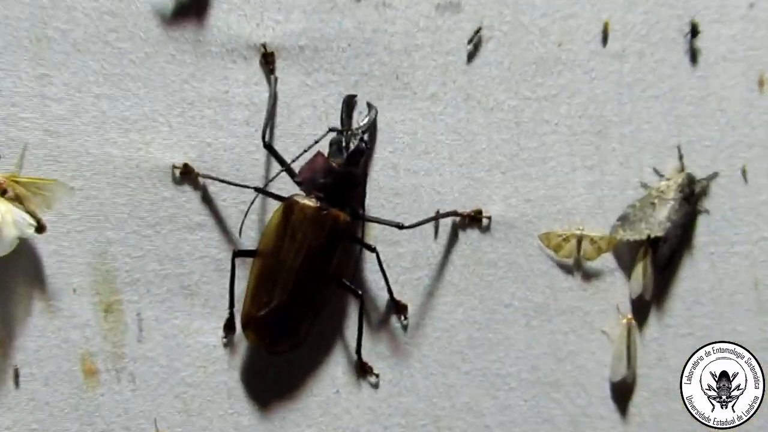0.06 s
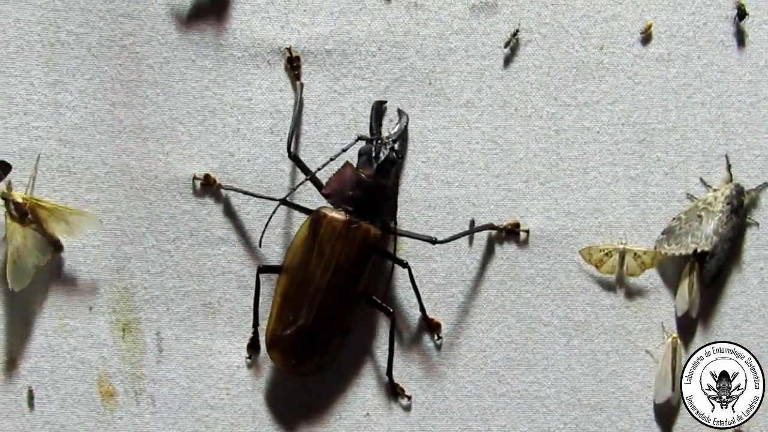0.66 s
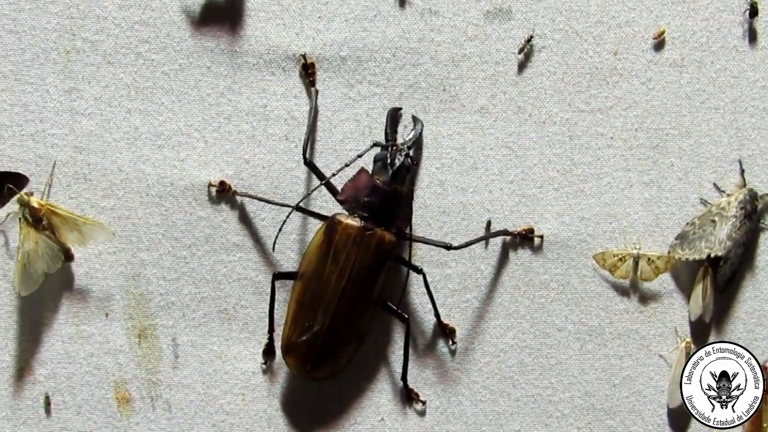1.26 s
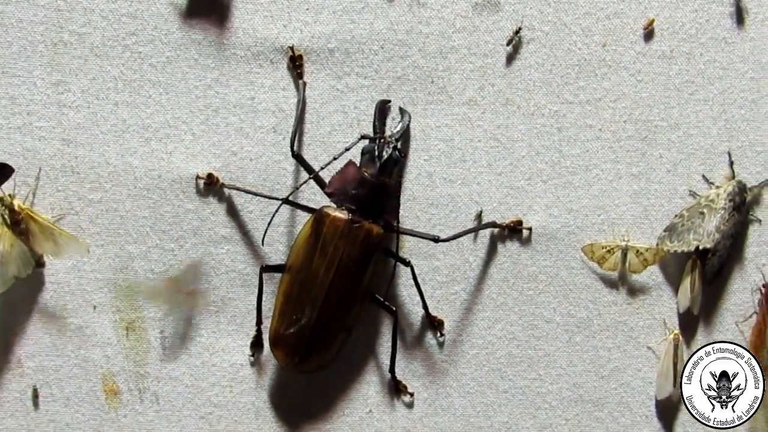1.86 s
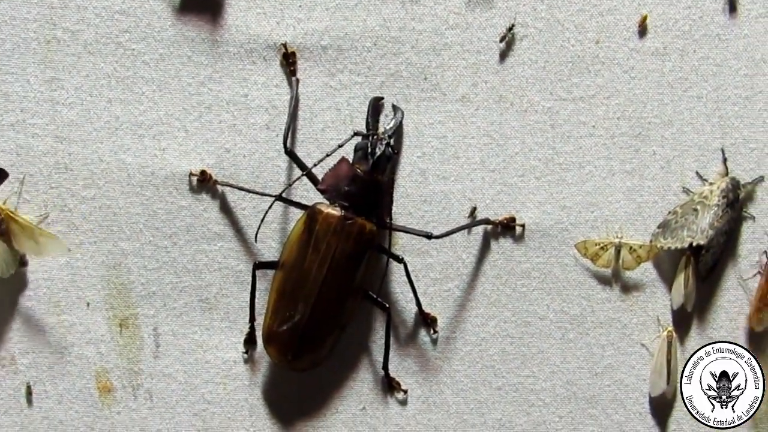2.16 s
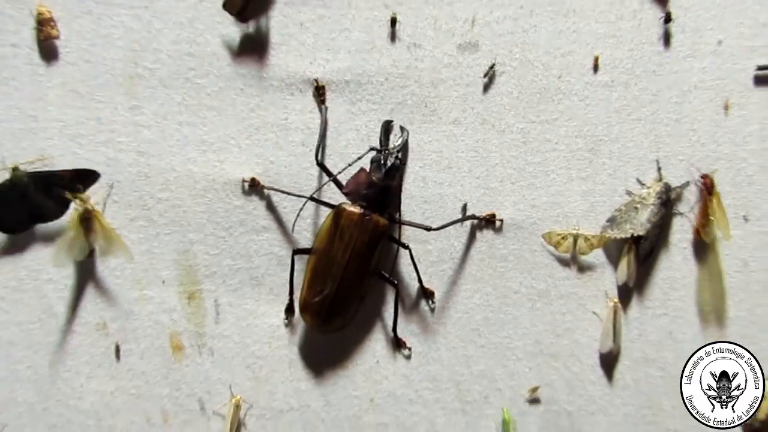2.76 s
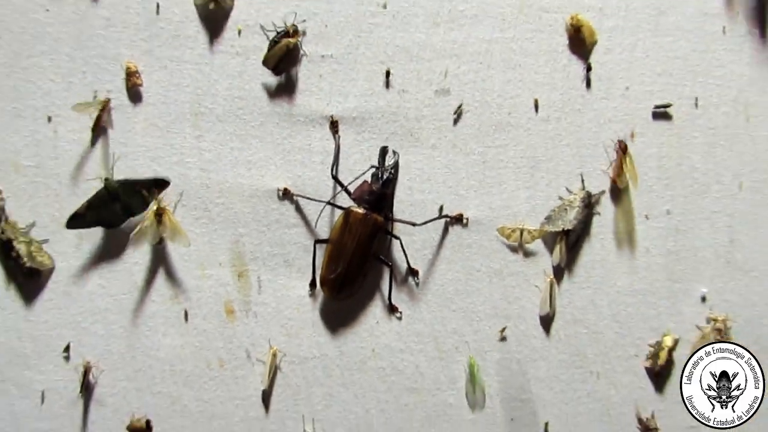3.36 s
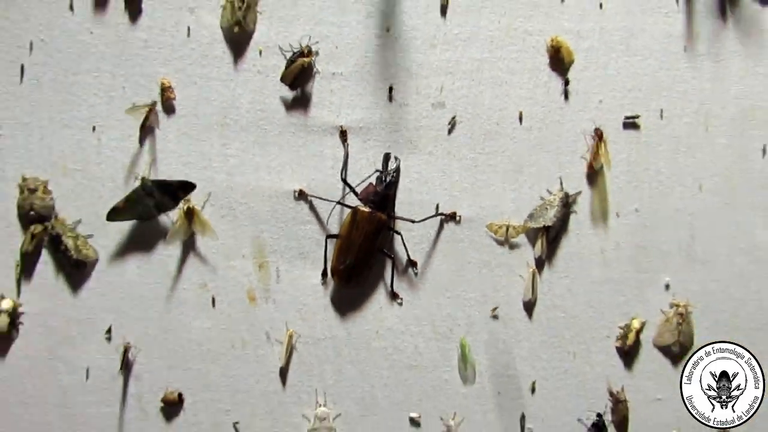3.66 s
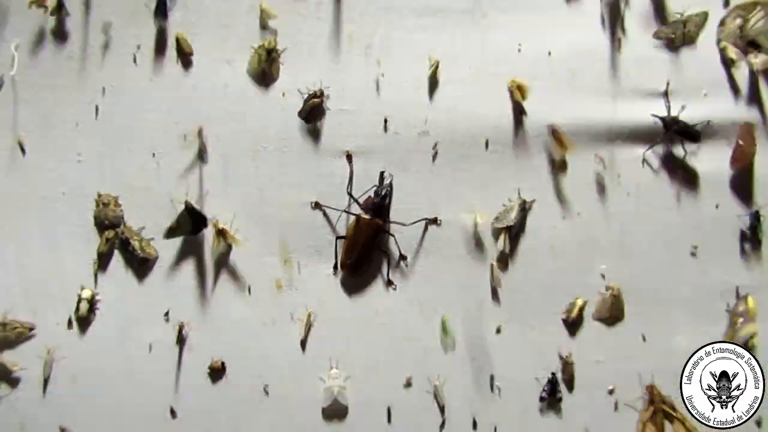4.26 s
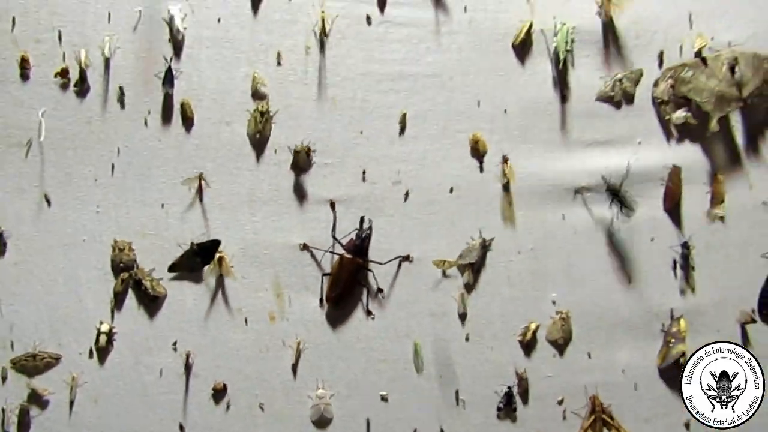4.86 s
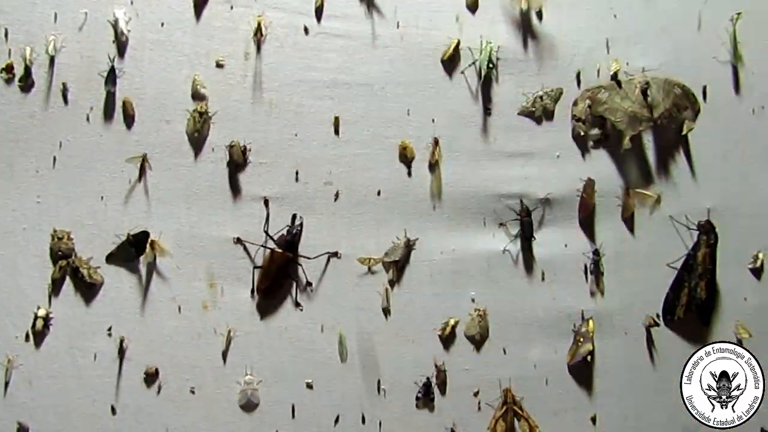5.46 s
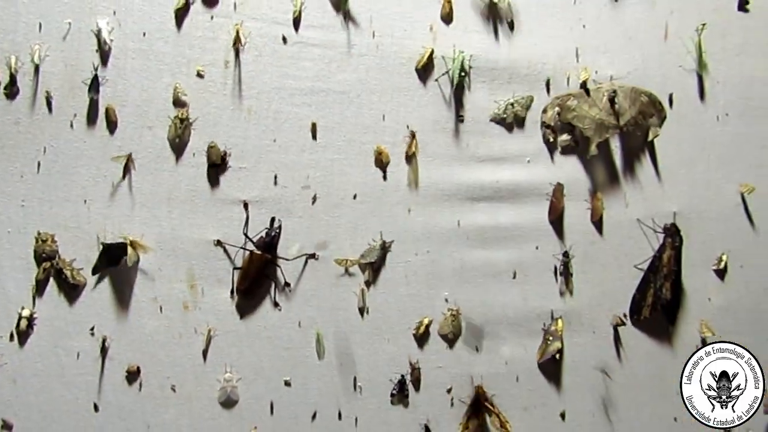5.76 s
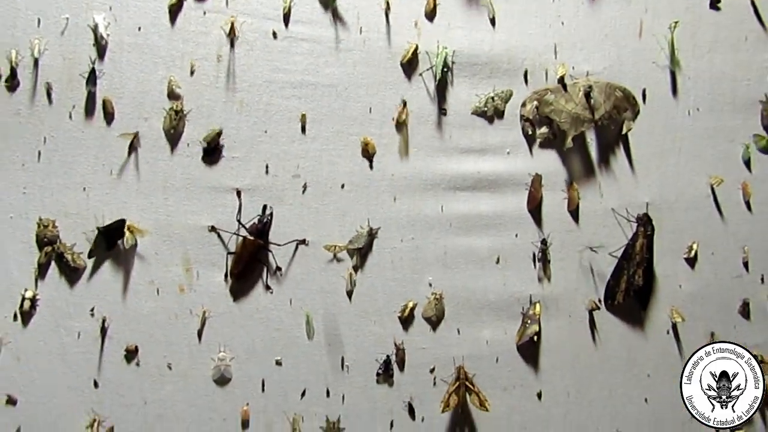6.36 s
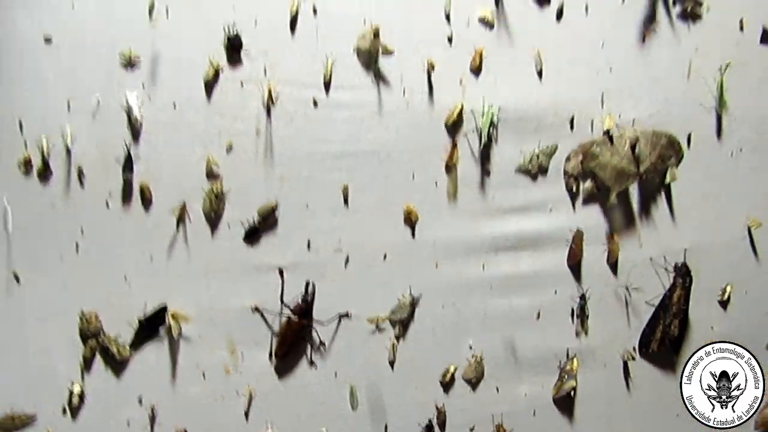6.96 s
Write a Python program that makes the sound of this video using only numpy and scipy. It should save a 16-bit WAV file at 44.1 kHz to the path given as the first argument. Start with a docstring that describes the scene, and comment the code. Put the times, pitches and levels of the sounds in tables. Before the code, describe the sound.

Insects tap and click against a cloth sheet over steady night hiss, high katydid rasping and a few very high chirps.

```python
"""Outdoors at night beside a lamp-lit sheet, heard through a small handheld camera's stereo microphone.
Up close, insects thud on the cloth and their hard shells crack, tick and ring on the things around it.
A few very high chirps pass close by; farther out, crickets and a high katydid chorus fill the dark.
Fingers rustle on the camera body, and the lamp's supply hums faintly in the steady night air."""
import sys
import numpy as np
from scipy import signal
from scipy.fft import rfft, irfft, next_fast_len
from scipy.io import wavfile

SR = 44100
rng = np.random.default_rng(int(sys.argv[2]) if len(sys.argv) > 2 else 0)


def wav_record(signal):
    """Record a signal, one row per channel, as 16-bit PCM in the file named by sys.argv[1]."""
    frames = np.transpose(np.atleast_2d(signal))
    bounded = np.clip(frames, -1, 1)
    # unit amplitude maps onto the largest positive 16-bit level
    quanta = np.round(bounded * 32767).astype(np.int16)
    wavfile.write(sys.argv[1], SR, quanta)


N = 313110
EDGE_HZ = 15700  # top of the microphone's range
# how alike the two microphone ports hear: (frequency [Hz], left-right likeness [-1..1])
LIKENESS = [(40, -0.46), (300, -0.79), (740, -0.61), (2000, -0.063), (3300, 0.39), (5500, 0.51),
            (13000, -0.29)]


def knocks(thud_t60=0.026, crack_t60=0.018, splinter_db=-14):
    """Insects hit the sheet: the cloth gives a damped thud, the hard shell a shorter crack on top."""
    # (time [s], thud level [dB], thud centre [Hz], crack level [dB], left-right likeness [-1..1])
    hits = [(0.1934, -30, 560, -28.5, -0.33), (0.1973, -38, 850, -25.5, 0.34),
            (0.3073, -29, 1090, -50, -0.43), (0.875, -45, 895, -42.5, 0.99),
            (1.7217, -40, 666, -38.5, 0.93), (1.7619, -34.5, 390, -32.5, 0.024),
            (2.227, -50, 590, -39, 0.23), (2.308, -32.5, 620, -25, -0.45), (2.3148, -29, 500, -34, -0.24),
            (2.3215, -37, 546, -26, -0.71), (2.396, -45, 900, -32.5, -0.56), (2.42, -31, 400, -40, -0.71),
            (2.6383, -36, 800, -24.5, -0.11), (2.7135, -47, 700, -37, 0.41),
            (3.1075, -29.5, 590, -35, -0.25), (3.835, -34.5, 860, -35, -0.24),
            (3.8962, -31, 450, -46, -0.38), (4.302, -36, 393, -39, 0.18), (4.313, -39, 702, -42, 0.7),
            (4.798, -32.5, 600, -32.5, -0.7), (5.4482, -34.5, 1110, -44.5, 1), (6.2, -37, 930, -57, 0.94),
            (6.489, -40, 1030, -38, 0.97), (6.4991, -40.5, 1200, -47, 0.87), (6.5665, -43, 1150, -43.5, 1),
            (6.654, -37, 710, -33.5, -0.22), (6.886, -41.5, 500, -46, 0.28), (6.931, -41, 700, -43, -0.21),
            (6.9767, -33, 520, -33.5, -0.23), (7.0314, -40, 950, -50, 0.79)]
    out = np.zeros((2, N))
    for s, thud_db, hz, crack_db, likeness in hits:
        thud = burst(hz / 1.44, hz * 1.44, thud_t60, likeness, order=1)
        crack = burst(1300, 3000, crack_t60, likeness, snap=0.17)
        splinter = gain_of(splinter_db) * burst(7000, 8800, crack_t60, likeness, order=1, snap=2.9)
        add(out, s, gain_of(thud_db) * thud + gain_of(crack_db) * (crack + splinter))
    return out


def shell_ticks(top_db=-3, ring_db=-8, ring_hz=7200):
    """Shells and legs make light, bright ticks, and each sets a thin ring going."""
    # (time [s], level [dB], centre [Hz])
    ticks = [(0.527, -41, 9500), (0.875, -42.5, 8000), (0.942, -34, 9000), (1.572, -37, 8400),
             (2.3083, -36.5, 4500), (2.3224, -34, 6100), (2.639, -37.5, 8600), (2.567, -42, 5450),
             (4.8847, -43.5, 8700), (5.449, -34, 5100), (5.466, -40.5, 6000), (6.488, -31, 6260),
             (6.566, -40.5, 6600), (6.852, -42.5, 8400)]
    out = np.zeros((2, N))
    for s, db, hz in ticks:
        body = burst(hz / 1.53, hz * 1.53, t60=0.024, likeness=1, order=4, rise=0.0001, snap=1.7)
        top = gain_of(top_db) * burst(hz, EDGE_HZ, t60=0.002, likeness=0.8, order=1)
        ring = gain_of(ring_db) * burst(ring_hz / 1.04, ring_hz * 1.04, t60=0.067, likeness=1)
        add(out, s, gain_of(db) * (body + top + ring))
    return out


def pings(rattle_rad=0.35):
    """Hard things by the sheet ring briefly when hit, with a slight rattle."""
    # (time [s], pitch [Hz], level [dB], t60 [s])
    rings = [(0.198, 970, -25.5, 0.03), (2.396, 1610, -30, 0.056), (3.108, 850, -22, 0.021),
             (4.6, 2420, -25.5, 0.031), (4.799, 1150, -24.5, 0.035), (5.4502, 2492, -31, 0.14),
             (5.467, 6891, -35, 0.065), (6.655, 491, -32.5, 0.068), (6.979, 443, -32, 0.063)]
    t, out = np.arange(SR // 4) / SR, np.zeros((2, N))
    for s, hz, db, t60 in rings:
        phase = 2 * np.pi * hz * t + rattle_rad * drift(hz / 2, len(t))
        add(out, s, gain_of(db) * decay(t, t60) * np.sin(phase))
    return out


def bumps():
    """Some blows land as soft, low bumps."""
    # (time [s], level [dB], centre [Hz], t60 [s])
    blows = [(0.305, -33, 80, 0.054), (2.695, -29.5, 160, 0.064), (3.896, -29.5, 170, 0.019),
             (4.311, -27.5, 66, 0.04), (6.886, -36.5, 120, 0.0185)]
    out = np.zeros((2, N))
    for s, db, hz, t60 in blows:
        add(out, s, gain_of(db) * burst(hz / 1.64, hz * 1.64, t60, read(LIKENESS, hz), order=1))
    return out


def clacks(t60=0.003, left_lag_s=0.00018, left_db=-4.5):
    """A shell hits squarely: a hard swing of pressure, gone in a few cycles, at the right port first."""
    # (time [s], level [dB], pitch [Hz])
    square_hits = [(0.198, -10, 2450), (2.3084, -11, 2600), (2.3162, -19.5, 970), (2.6391, -2.5, 2200)]
    out = np.zeros((2, N))
    t = np.maximum(np.arange(SR // 4) / SR - np.array([[left_lag_s], [0]]), 0)
    for s, db, hz in square_hits:
        add(out, s, gain_of(db) * np.sin(2 * np.pi * hz * t) * decay(t, t60))
    return out * gain_of([[left_db], [0]])


def patter(count=55, pat_db=-47, tick_db=-58, scatter_db=4):
    """Small insects brush the sheet at random: a faint pat with a fine tick of legs."""
    out = np.zeros((2, N))
    for when, octaves, force in rng.uniform(-1, 1, (count, 3)):
        hz = 1300 * 2 ** octaves
        pat = gain_of(pat_db) * burst(hz / 2, hz * 2, t60=0.025, likeness=-0.04, order=1)
        tick = gain_of(tick_db) * burst(7400, 8000, t60=0.0071, likeness=1)
        add(out, (when + 1) / 2 * N / SR, gain_of(scatter_db * force) * (pat + tick))
    return out


def scuffs(grain_db=4, grain_hz=220):
    """Dry, grainy scrapes swell and fade as legs and wings catch on the weave."""
    # (middle [s], half length [s], centre [Hz], level [dB])
    scrapes = [(0.468, 0.092, 9200, -46.5), (2.425, 0.02, 900, -41), (2.69, 0.063, 168, -36.5),
               (4.634, 0.16, 1940, -45), (4.9, 0.064, 900, -40.5), (5.875, 0.32, 10000, -48.5)]
    t, out = np.arange(N) / SR, np.zeros((2, N))
    grain = evened(gain_of(grain_db * drift(grain_hz, N)))
    for middle, half_length, hz, db in scrapes:
        swell = np.exp(-((t - middle) / half_length) ** 2)
        out += gain_of(db) * swell * band(hz, width=min(2.7 * hz, 3000))
    return out * grain


def high_chirps(curve_hz_per_s2=95000, reach_hz=270, waver_hz=35, rough_db=0.6):
    """Very high, nearly pure strokes dip and rise in pitch as they pass close to the microphone."""
    # (time [s], length [s], level [dB], lowest pitch [Hz], place of the dip [share of length],
    #  left over right at the start [dB], left over right at the end [dB])
    strokes = [(2.703, 0.053, -32, 11190, .25, -3, 12), (3.231, 0.064, -32, 11240, .2, 18.5, -22),
               (3.721, 0.11, -30.5, 11170, 0.38, 10, -27), (4.221, 0.085, -30.5, 11180, 0.056, -2, -18),
               (4.328, 0.053, -32.5, 11300, .55, -19, -25), (4.715, 0.097, -29, 11180, .25, -1, -21)]
    out = np.zeros((2, N))
    for s, length, db, low_hz, dip_at, pan_start, pan_end in strokes:
        size = int(length * SR)
        progress = np.linspace(0, 1, size)
        bend_hz = curve_hz_per_s2 * ((progress - dip_at) * length) ** 2
        hz = low_hz + reach_hz * np.tanh(bend_hz / reach_hz) + waver_hz * drift(400, size)
        tone = np.sqrt(2) * np.sin(2 * np.pi * np.cumsum(hz) / SR)
        level = gain_of(db + rough_db * drift(250, size)) * signal.windows.tukey(size, 0.51)
        pan_db = pan_start + (pan_end - pan_start) * progress
        sides = gain_of([pan_db / 2, -pan_db / 2])
        add(out, s, tone * level * sides / sides.mean(0))
    return out


def whine(middle_s=5.97, half_length_s=0.12, hz=9840, climb_hz_per_s=600, db=-50, fuzz_hz=45):
    """One insect's thin whistle swells and fades, climbing a little."""
    t = np.arange(N) / SR - middle_s
    tone = np.sin(2 * np.pi * (hz + climb_hz_per_s * t / 2) * t)
    swell = np.exp(-(t / half_length_s) ** 2)
    return gain_of(db) * swell * drift(fuzz_hz, N) * tone


def katydids(far_db=-48.5, rasp_db=1.94, rasp_hz=130, wander_hz=45):
    """Far katydids rasp throughout; nearer ones join for a while, each on its own wandering pitch."""
    # one katydid's rasp, with a narrow ring near its top: (frequency [Hz], spectral level [dB])
    rasp_spectrum = [(7500, -22.5), (10400, -11), (11600, -3), (12650, -4.5), (12960, -1), (13300, -3.5),
                     (14500, -29), (15000, -59)]
    # the nearer singers: (start [s], end [s], level [dB], rise [s], pitch shift [Hz])
    songs = [(-0.1, 0.777, -41.5, .1, -31.5), (1.653, 4.85, -42, 0.56, 10), (2.24, 2.853, -42.5, .2, -150),
             (4.803, 5.58, -42, .15, -330), (5.88, 6.64, -45, 0.68, 91)]
    out = gain_of(far_db) * wash(rasp_spectrum)
    for start, end, db, rise_s, shift_hz in songs:
        shifter = np.exp(2j * np.pi * np.cumsum(shift_hz + wander_hz * drift(2, N)) / SR)
        analytic_rasp = signal.hilbert(wash(rasp_spectrum), next_fast_len(N))[:, :N]
        level = gate(start, end, rise_s, fall_s=0.13) * gain_of(db + rasp_db * drift(rasp_hz, N))
        out += level * (analytic_rasp * shifter).real
    return out


def crickets(flutter_db=1.0, uneven_db=2.5, slip_s=0.03, chirp_s=0.16):
    """Many far crickets blur into fluttering bands; two nearer ones chirp, each to its own loose beat."""
    # far trills: (centre [Hz], width [Hz], level [dB])
    trills = [(2972, 270, -55), (4577, 330, -53), (4646, 184, -53), (4830, 170, -56), (5400, 470, -58.5)]
    # nearer crickets: (first chirp [s], period [s], pitch [Hz], level [dB])
    chirpers = [(0.215, .537, 6670, -58.5), (0.38, .74, 6540, -58.5)]
    t, far, near = np.arange(N) / SR, np.zeros((2, N)), np.zeros((2, N))
    for hz, width, db in trills:
        far += gain_of(db) * evened(band(hz, width) * gain_of(flutter_db * drift(60, N)))
    for first_s, period_s, hz, db in chirpers:
        beat = (t - first_s + slip_s * drift(1, N)) / period_s
        off_beat_s = (beat - np.round(beat)) * period_s
        chirps = np.exp(-(2 * off_beat_s / chirp_s) ** 4)
        near += gain_of(db + uneven_db * drift(1.4, N)) * chirps * band(hz, width=85)
    return lean_right(far, db=1.1) + near


def handling(still_db=-53, lumpy_db=2.5, slip_count=150, slip_db=-3, scatter_db=4):
    """Fingers rustle low and unevenly on the camera body; the skin catches and slips in small ticks."""
    # the rustle: (frequency [Hz], spectral level [dB])
    rustle_spectrum = [(25, -3), (60, 0), (250, 3.5), (520, 2.5), (1000, -5), (1800, -8), (3000, -12),
                       (12000, -24.5)]
    # the hand shifts its grip: (start [s], end [s], level [dB])
    grips = [(-0.1, 0.33, -40), (1.7, 4.95, -48.5), (2.38, 3.6, -44.5), (3.4, 4.35, -42)]
    shifts = [gain_of(db) * gate(start, end, rise_s=0.034, fall_s=0.073) for start, end, db in grips]
    level = np.sqrt(gain_of(still_db) ** 2 + np.sum(np.square(shifts), axis=0))  # powers add
    rub = wash(rustle_spectrum) * gain_of(lumpy_db * drift(38, N))
    for when, octaves, force in rng.uniform(-1, 1, (slip_count, 3)):
        hz = 560 * 2 ** octaves
        slip = burst(hz / 2, hz * 2, t60=0.015, likeness=read(LIKENESS, hz), order=1)
        add(rub, (when + 1) / 2 * N / SR, gain_of(slip_db + scatter_db * force) * slip)
    return lean_right(level * rub, db=1)


def lamp(move_start_s=1.5, move_end_s=5.5, moved_db=-6):
    """The fuzzy hum of the lamp's supply weakens as the camera moves."""
    # (centre [Hz], width [Hz], level [dB])
    hum_bands = [(120.5, 11, -55), (522.6, 64, -52)]
    level = gain_of(np.interp(np.arange(N) / SR, [move_start_s, move_end_s], [0, moved_db]))
    return level * sum(gain_of(db) * band(hz, width) for hz, width, db in hum_bands)


def night_air(db=-44.5):
    """The steady hush of the open air lies behind everything."""
    # (frequency [Hz], spectral level [dB])
    air_spectrum = [(25, -6), (60, 3.5), (160, 4), (900, -1), (2000, -7), (5500, -9.5), (7000, -11),
                    (9500, -11), (14400, -20.5), (15000, -64)]
    return gain_of(db) * wash(air_spectrum)


def surroundings(x, t60=0.13, wet_db=-20, gap_s=0.004, cutoff_hz=6000):
    """The ground and things nearby add weak, dull reflections."""
    t = np.arange(SR // 3) / SR
    tail = rng.standard_normal((2, len(t))) * decay(t, t60) * (t > gap_s)
    tail = signal.sosfilt(signal.butter(1, cutoff_hz, fs=SR, output="sos"), tail)
    return x + gain_of(wet_db) * signal.fftconvolve(x, tail / np.linalg.norm(tail[0]), axes=1)[:, :N]


def gain_of(db):
    """Decibels to amplitude."""
    return 10 ** (np.asarray(db) / 20)


def lean_right(x, db):
    """Lowers the left channel and raises the right, each by db."""
    return x * gain_of([[-db], [db]])


def evened(x):
    """Scales to an rms of 1."""
    return x / np.sqrt(np.mean(x ** 2) + 1e-20)


def read(points, hz):
    """Reads a table on a log-frequency axis."""
    f, value = np.transpose(points)
    return np.interp(np.log(hz + 1), np.log(f + 1), value)


def add(mix, s, sound):
    """Mixes a sound in at time s."""
    part = mix[:, max(round(s * SR), 0):][:, :sound.shape[-1]]
    part += sound[..., :part.shape[1]]


def decay(t, t60):
    """Gain that falls 60 dB in t60 seconds."""
    return np.exp(-np.log(1000) * t / t60)


def gate(start, end, rise_s, fall_s):
    """Gain that rises, holds at 1 and falls."""
    t = np.arange(N) / SR
    return np.clip(.5 + (t - start) / rise_s, 0, 1) * np.clip(.5 + (end - t) / fall_s, 0, 1)


def drift(rate_hz, size):
    """Random wander of rms 1, with changes up to about the given rate."""
    padded = next_fast_len(size)
    hz = np.fft.rfftfreq(padded, 1 / SR)
    spectrum = rfft(rng.standard_normal(padded)) * np.exp(-(hz / rate_hz) ** 2)
    return evened(irfft(spectrum, padded))[:size]


def spread(pair, likeness):
    """Two unrelated signals become left and right with the given likeness."""
    likeness = np.clip(likeness, -.98, .98)
    mid, side = np.sqrt((1 + likeness) / 2) * pair[0], np.sqrt((1 - likeness) / 2) * pair[1]
    return np.array([mid + side, mid - side])


def noise(shape):
    """Stereo noise of rms 1 whose amplitude spectrum is shape(Hz)."""
    size = next_fast_len(N)
    hz = np.fft.rfftfreq(size, 1 / SR)
    white = spread(rfft(rng.standard_normal((2, size))), read(LIKENESS, hz))
    return evened(irfft(white * shape(hz), size)[:, :N])


def wash(spectrum):
    """Broad noise with a tabled spectrum."""
    return noise(lambda hz: gain_of(read(spectrum, hz)))


def band(centre, width):
    """Noise in one steep resonance."""
    return noise(lambda hz: 1 / (1 + (3.3 * (hz - centre) / width) ** 2))


def burst(low_hz, high_hz, t60, likeness, order=2, rise=0.00017, snap=0):
    """A dying puff of band noise with the energy of 10 ms at rms 1; snap adds a spike at contact."""
    t = np.arange(SR // 4) / SR
    contact = np.exp(-t / rise)
    envelope = (1 - contact) * decay(t, max(t60, rise)) + snap * contact
    bandpass = signal.butter(order, [low_hz, min(high_hz, EDGE_HZ)], "band", fs=SR, output="sos")
    pair = signal.sosfilt(bandpass, rng.standard_normal((2, len(t))) * envelope)
    return spread(pair / np.linalg.norm(pair, axis=1, keepdims=True), likeness) * np.sqrt(SR / 100)


def scene():
    """Impacts at the sheet and their reflections, over the small sounds nearby and the night chorus."""
    night = night_air() + crickets() + katydids() + high_chirps() + whine()
    nearby = lamp() + handling() + scuffs()
    impacts = lean_right(knocks() + shell_ticks() + pings() + bumps(), db=0.7)
    return night + nearby + surroundings(impacts + clacks() + patter())


def record(dry):
    """The camera's microphone cuts two narrow notches and loses the very top."""
    # dead bands: (centre [Hz], width [Hz])
    dead_bands = [(3975, 284), (7900, 240)]
    hz = np.fft.rfftfreq(N, 1 / SR)
    dips = [1 - np.exp(-(2 * (hz - centre) / width) ** 2) for centre, width in dead_bands]
    notched = irfft(rfft(dry) * np.prod(dips, axis=0), N)
    band_limit = signal.firwin(255, EDGE_HZ, window=("kaiser", 9), fs=SR)
    return signal.oaconvolve(notched, band_limit[None], "same")


dry = scene()
out = record(dry)
wav_record(out)
```